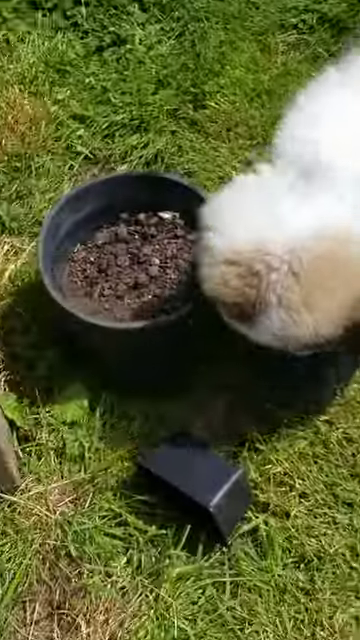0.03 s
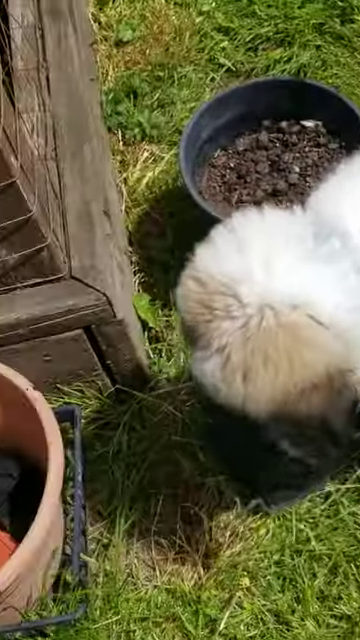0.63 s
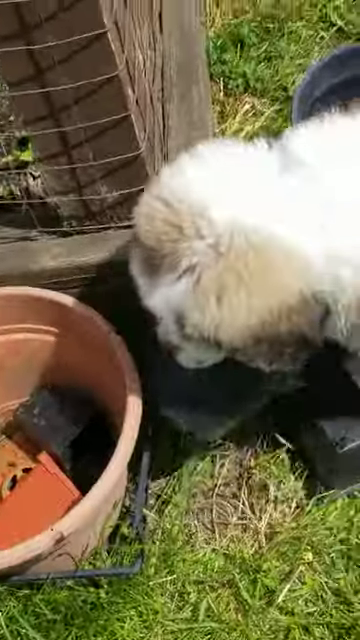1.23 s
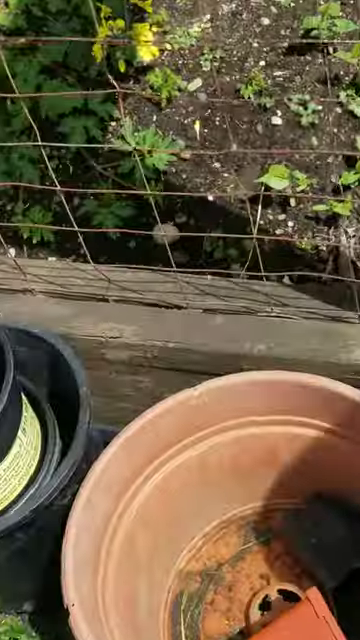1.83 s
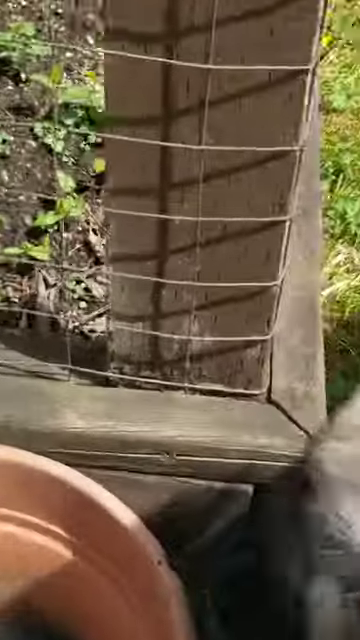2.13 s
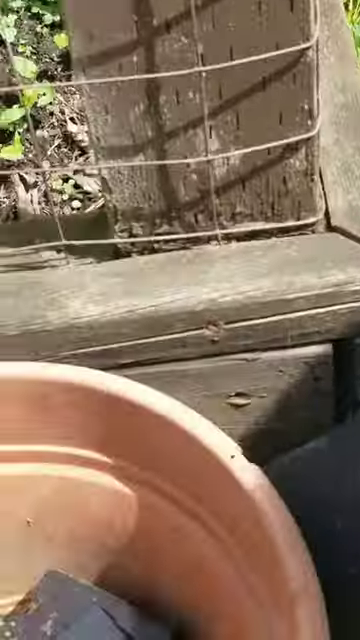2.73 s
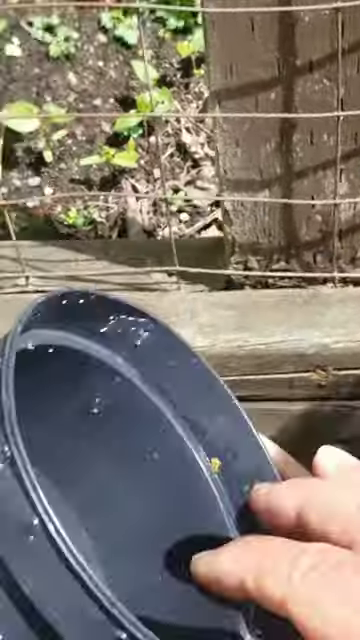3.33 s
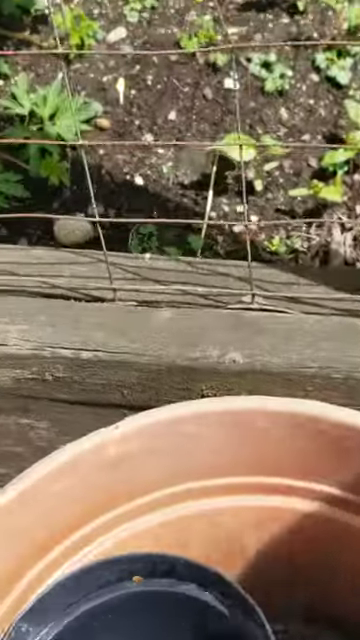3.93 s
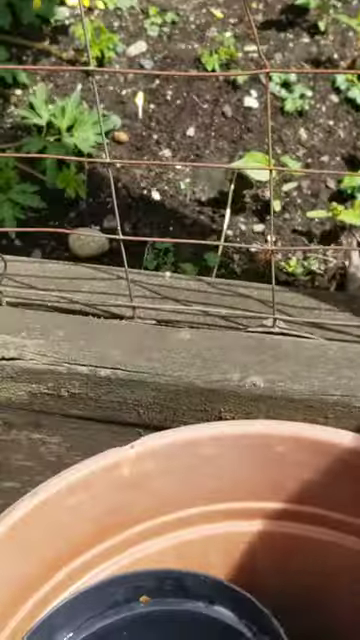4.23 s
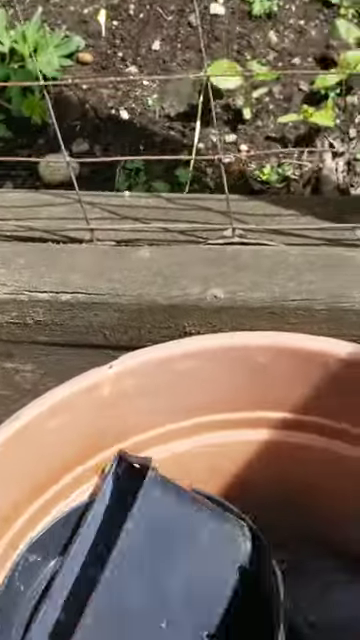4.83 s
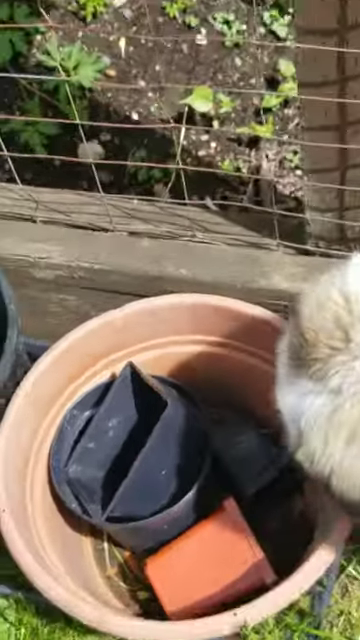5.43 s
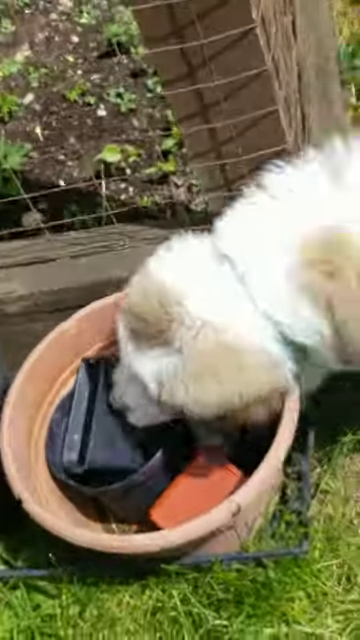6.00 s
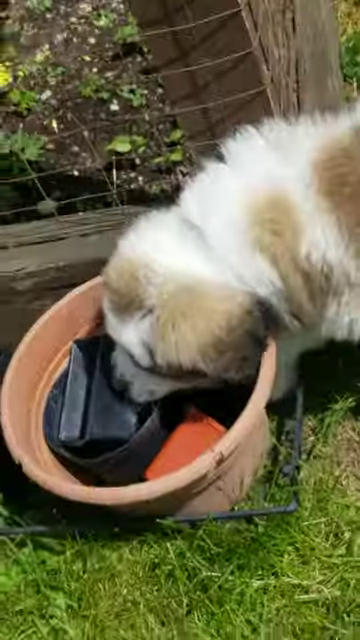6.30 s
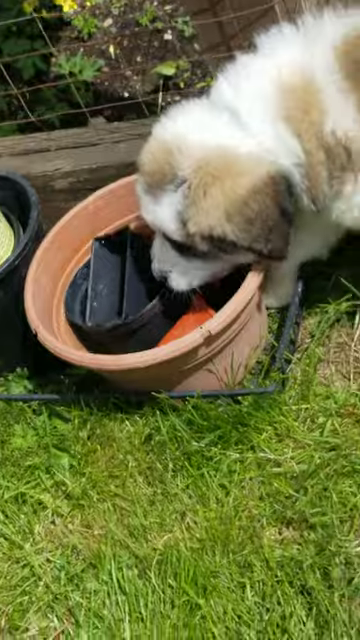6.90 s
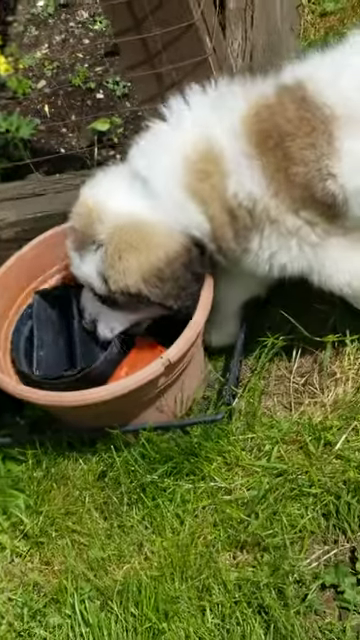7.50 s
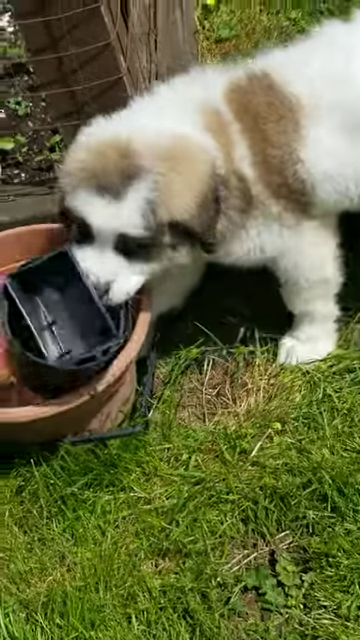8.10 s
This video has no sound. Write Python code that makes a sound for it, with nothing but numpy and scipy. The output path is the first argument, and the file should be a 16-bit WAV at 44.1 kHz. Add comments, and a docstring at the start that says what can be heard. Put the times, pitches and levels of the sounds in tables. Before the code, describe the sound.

A puppy noses thin plastic plant pots on a lawn, making light, hollow knocks while wind bumps the microphone. The pots are picked up and dropped into a large tub in two louder bursts of clattering and scraping. After a short lull the puppy chews them, with two sharp cracks, small taps and soft brushing of fur. The pots sound close, with faint grass rustle and a far engine hum behind.

```python
"""A puppy and plastic pots

A puppy noses plastic plant pots on a lawn; the pots are picked up and dropped into a big tub,
where it chews them. Thin walls chatter, scrape and snap, and the hollow pots and the tub ring
briefly. Fur brushes the plastic and steps rustle the grass. A breeze bumps the microphone,
and an engine drones far away."""
import sys
import numpy as np
from scipy import signal
from scipy.io import wavfile

SR = 44100
rng = np.random.default_rng(int(sys.argv[2]) if len(sys.argv) > 2 else 0)


def unload_audio(sound):
    """Save the sound as a 16-bit wav file, at the path given as the first command line argument."""
    columns = np.transpose(np.atleast_2d(sound))
    # keep every value between -1 and 1, then stretch to whole-number steps
    steps = np.round(np.clip(columns, -1, 1) * 32767)
    wavfile.write(sys.argv[1], SR, steps.astype(np.int16))


N = 359612
SIZE = 8192  # samples in one short sound
T = np.arange(SIZE) / SR

# Pots knocking; a decay time (t60) is how long a sound takes to fall by 60 dB:
# (time [s], wall [dB], hollow [dB], tub [dB], favoured wall pitch [Hz], chatter decay [s])
POT_KNOCKS = [(0.102, -33, -42.5, -45, 1390, 0.081), (0.296, -30, -50, -38.5, 2130, 0.094),
              (0.74, -40, -47.5, -46, 1800, 0.081), (1.111, -39, -59, -44, 1700, 0.061),
              (1.439, -31, -43, -57, 1240, 0.12), (1.47, -26, -38.5, -41.5, 1420, 0.085),
              (1.839, -32.5, -43.5, -39.5, 1400, 0.052), (1.904, -40.5, -50, -50, 1410, 0.052),
              (1.967, -49, -55, -48.5, 1080, .033), (2.409, -46, -40, -46, 1040, 0.047),
              (2.611, -26, -34, -38, 1800, 0.058), (2.631, -27.5, -47, -44, 2360, 0.06),
              (2.647, -26, -36, -33, 1240, 0.051), (2.659, -32, -22, -41, 1180, 0.047),
              (2.695, -29.5, -38.5, -44, 1280, 0.037), (2.736, -37, -36.5, -49.5, 1170, .06),
              (2.878, -27, -35, -35, 1100, .1), (3.066, -32, -41.5, -38, 1420, 0.043),
              (3.107, -19.5, -30, -27, 1490, 0.053), (3.385, -38.5, -41, -40, 1510, 0.059),
              (3.436, -12.5, -25.5, -18.5, 1700, 0.071), (3.451, -21, -33, -22, 1310, 0.038),
              (3.477, -25.5, -56, -34, 1360, 0.063), (3.499, -32, -27, -29, 1230, 0.086),
              (3.55, -21, -35, -32, 2200, .09), (3.558, -14, -27.5, -28, 1260, 0.094),
              (3.589, -25.5, -30, -35, 1170, 0.069), (3.616, -22.5, -19.5, -28, 1190, .08),
              (3.641, -15.5, -25, -30, 1540, .027), (3.657, -40, -21, -42, 1020, 0.075),
              (3.691, -25.5, -32, -37, 2060, 0.11), (3.712, -31.5, -36, -43, 1550, 0.017),
              (3.776, -27.5, -31, -37, 1330, 0.056), (4.052, -23.5, -38, -40, 2110, 0.058),
              (4.106, -27, -34, -39, 1770, 0.056), (4.152, -25.5, -36, -51, 2150, 0.19),
              (4.182, -23, -38, -30.5, 1700, 0.057), (4.263, -28.5, -50, -46, 1510, .1),
              (4.321, -27.5, -53, -38, 1040, 0.066), (4.336, -11.5, -27.5, -24, 1780, 0.1),
              (4.362, -15, -29, -42, 1750, 0.068), (4.477, -19.5, -38, -33.5, 1810, 0.063),
              (4.491, -23.5, -34, -34, 1050, 0.12), (4.529, -26, -38, -33.5, 1400, 0.25),
              (4.638, -22, -37, -25.5, 1500, .06), (4.655, -17, -30.5, -23, 1590, 0.093),
              (4.679, -24.5, -37, -32.5, 1800, 0.11), (4.719, -18, -37, -20.5, 1740, 0.093),
              (4.796, -34.5, -54, -34.5, 1080, 0.064), (4.84, -33, -39, -35.5, 1180, 0.11),
              (4.913, -30.5, -39, -36, 1117, 0.052), (5.467, -29, -55, -48, 1390, 0.037),
              (5.53, -32, -55, -51, 1120, 0.085), (5.647, -32, -55, -57, 2010, 0.014),
              (5.677, -39, -39, -53, 1344, 0.071), (5.897, -35, -41, -49, 1400, 0.049),
              (6.019, -24, -40.5, -36, 1090, 0.087), (6.118, -28.5, -40, -42, 2320, 0.096),
              (6.376, -33.5, -43, -50, 1010, 0.05), (6.515, -34.5, -52, -43.5, 1030, 0.034),
              (6.771, -26, -47, -57, 1130, 0.065), (6.789, -26, -45, -34.5, 1020, 0.048),
              (6.901, -24, -37, -38, 1410, 0.025), (7.046, -40, -40, -36, 1624, .028),
              (7.15, -29, -59, -36.5, 2350, 0.19), (7.207, -26, -46, -35, 990, 0.078),
              (7.261, -24, -47, -30.5, 1000, 0.067), (7.403, -32.5, -43, -41, 2200, .07),
              (7.552, -29, -53, -38.5, 1760, 0.12), (7.615, -34.5, -47, -55, 1560, 0.062),
              (7.738, -23, -37.5, -38, 1210, 0.055), (7.753, -28, -44, -44, 1310, 0.15),
              (7.896, -34.5, -43.5, -57, 1200, 0.034), (7.923, -26, -39.5, -32, 1920, .05),
              (7.946, -28, -44.5, -45, 1600, 0.081)]
# plastic buckling under a hand or teeth: (time [s], crack [dB], sheet [dB], tub [dB], decay [s])
WALL_SNAPS = [(2.711, -28, -62, -52, 0.056), (3.559, -10.5, -39, -52, 0.052),
              (3.642, -19.5, -55, -55, 0.014), (4.052, -22.5, -46, -53, 0.043),
              (4.337, -16.5, -35, -54, 0.081), (4.364, -22, -38, -50, 0.054),
              (4.638, -21, -46.5, -50, 0.03), (6.153, -8, -25.5, -37, 0.023), (6.406, -20, -56, -69, .03),
              (6.422, -26, -63, -60, 0.036), (6.454, -5, -32.5, -51, 0.035), (6.72, -47, -52, -57, 0.035),
              (7.209, -25.5, -39, -55, .05), (7.318, -34, -53, -70, .03)]
# strokes of rubbing: (time of peak [s], level [dB], swell [s], fade [s])
SCRAPE_STROKES = [(0.31, -49.5, 0.012, 0.032), (0.8, -59, .06, 0.078), (1.09, -62.5, 0.07, 0.034),
                  (1.42, -59, 0.035, 0.12), (1.79, -62, 0.013, 0.023), (2.09, -59, 0.094, 0.017),
                  (2.64, -56, 0.11, 0.15), (3.085, -51, 0.015, 0.017), (3.62, -42, 0.067, 0.045),
                  (3.81, -48, .045, .04), (4.33, -50, 0.11, 0.17), (4.675, -50.5, 0.024, 0.036),
                  (4.75, -48, 0.029, 0.057), (4.92, -52.5, 0.067, 0.051), (5.56, -61.5, 0.08, 0.17),
                  (6.06, -56.5, 0.14, 0.16), (6.53, -57, 0.36, 0.085), (6.82, -48, 0.041, 0.089),
                  (7.22, -54, 0.097, 0.18), (7.56, -56.5, 0.083, 0.1), (8.0, -60.5, .25, 0.36)]  # pot on pot
DRAG_STROKES = [(4.19, -28.5, .008, 0.012), (4.26, -42, 0.033, .14), (4.73, -36.5, 0.031, 0.057),
                (4.86, -51, 0.043, 0.096)]  # rim on tub
FUR_STROKES = [(6.125, -45, 0.016, 0.016), (6.25, -48.5, 0.061, 0.13), (6.435, -45, 0.04, 0.021),
               (6.585, -55.5, 0.048, 0.041), (6.838, -50.5, 0.09, 0.068), (7.21, -45.5, 0.065, 0.032),
               (7.265, -40, 0.0094, 0.019), (7.37, -51.5, 0.071, 0.041), (7.51, -48.5, 0.011, 0.024),
               (7.6, -53.5, .05, .04)]  # muzzle and fur on plastic
# the tones a thing rings with, called modes: (pitch [Hz], level [dB], decay [s])
WALL_MODES = [(1070, 0.5, 0.02), (1198, -0.5, 0.017), (1346, -1.5, 0.016), (1512, 1, 0.012),
              (1673, -2.5, 0.014), (1820, -2, 0.018), (1990, -2, 0.013), (2191, 0, 0.016),
              (2390, -8.5, 0.01), (2764, -6.5, 0.011), (3380, -3, 0.0051)]
HOLLOW_MODES = [(231, -0.5, 0.024), (320.5, -2, 0.035), (387.6, -2.5, 0.037), (467, -2, 0.022),
                (536, -10.5, 0.027)]
TUB_MODES = [(632, -8.5, 0.029), (748, -3, 0.026), (836, -7.5, 0.04), (956, -8.5, 0.026)]
SHEET_MODES = [(1765, -15, 0.092), (3720, -17, 0.026), (4640, 3, 0.019), (5280, 8.5, 0.015),
               (5900, 4, 0.015), (7060, 3, 0.017)]  # a thin wall as it snaps
# which side the pots are on: (time [s], left treble minus right [dB])
POT_SIDE = [(0, 6), (3, 7), (5.6, 6), (6.0, -1), (7.4, -3.5), (8.15, 6)]
# paws and feet in the grass: (time [s], level [dB])
GRASS_STEPS = [(0.27, -63), (0.8, -66), (1.1, -64), (1.47, -56.5), (1.93, -61), (2.25, -61.5), (2.6, -57.5),
               (2.85, -62), (3.05, -62), (5.3, -64.5), (5.598, -79), (7.8, -63.5), (8.08, -61.5)]
# breeze on the microphone: (time [s], level [dB])
BREEZE_LEVELS = [(0.0, -60.5), (0.43, -56.5), (1.18, -52.5), (1.29, -51), (1.72, -52.5), (2.11, -46),
                 (2.31, -47.5), (2.93, -50.5), (3.52, -48), (4.11, -56.5), (4.24, -54.5), (4.74, -54),
                 (5.26, -48), (5.67, -60), (5.88, -58), (6.22, -54), (7.58, -60.5), (8.15, -53)]
# single swirls of wind, called eddies: (time [s], bump [dB], higher flutter [dB])
EDDIES = [(1.19, -33.5, -56), (1.266, -34, -56), (1.352, -30.5, -60), (1.459, -36, -49),
          (1.679, -31.5, -58), (1.928, -40, -51), (2.057, -27.5, -42), (2.15, -26, -35),
          (2.275, -33, -42.5), (2.392, -22, -38), (2.455, -34, -31), (2.473, -22, -37), (2.532, -25, -40),
          (2.819, -34, -60), (3.186, -26.5, -58), (3.266, -21.5, -37.5), (3.892, -48, -43),
          (4.018, -34, -57), (4.801, -33, -45.5), (4.859, -42, -41), (5.071, -36, -43), (5.14, -25, -39.5),
          (5.42, -37.5, -60)]
# the far engine: (time [s], level [dB], turning rate [Hz])
ENGINE_RUN = [(0, -55, 67), (0.6, -54, 63), (1.2, -61.5, 61), (2.2, -71.5, 71), (5.3, -74, 59),
              (6.2, -58.5, 77), (7.0, -58, 64), (7.601, -49, 67), (8.15, -60, 65)]
# how each sound is spread from bass to treble: (frequency [Hz], level [dB])
CRACK_SPECTRUM = [(1500, -20), (2800, 2), (3800, 2), (4600, 5), (5300, 2), (6800, -1.5), (8300, -12),
                  (9800, 0), (11000, 4.5), (12500, -4), (15500, -7)]
SNAP_SPECTRUM = [(200, -19), (600, -25), (1200, -18), (1750, -4.5), (2900, -7.5), (3800, -6), (4700, -6.5),
                 (5400, -13), (7200, -1), (8500, -19), (11000, -6), (15500, -5)]
FUR_SPECTRUM = [(150, 13), (600, -12), (1500, -18), (3000, 1.5), (5200, 6), (7000, 4), (8800, -10),
                (10500, -0.5), (13000, 3), (15500, -3)]
GRASS_SPECTRUM = [(700, -27), (2000, -7), (4500, -1.5), (7000, -5.5), (8700, -7), (11000, -1.5),
                  (13000, -4), (15500, -4.5)]
WIND_SPECTRUM = [(15, -18), (35, -8.5), (65, 3), (110, -3), (180, -12.5), (300, -24), (600, -85),
                 (1500, -52)]
EDDY_SPECTRUM = [(15, -27.5), (40, -5), (70, -2.5), (130, -6), (220, -14.5), (500, -47), (1500, -98.5)]
FLUTTER_SPECTRUM = [(60, -11.5), (170, 2), (260, 0.5), (400, -9.5), (700, -20), (1500, -35), (4000, -49.5)]
ENGINE_SPECTRUM = [(60, 14), (250, -4), (380, 3.5), (630, 7), (760, 5.5), (1000, -4), (1300, -30),
                   (2000, -40)]
AIR_SPECTRUM = [(100, -7.5), (200, -0.5), (260, -3.5), (430, -1), (560, -4.5), (830, -6.5), (1120, -11),
                (1520, -19.5), (2500, -25), (3900, -22), (7500, -21.5), (8900, -26), (10800, -20.5),
                (15800, -22)]


def knock(edge, wall_db, hollow_db, tub_db, focus_hz, t60, rise_s=0.0016):
    """One knock rings the wall, the hollow of the pot and the tub; the hard edge adds a crack."""
    hardness = (0.047 / t60) ** 2  # a brief contact is mostly one clean blow
    rattle = chatter(t60, rise_s, first=8.7 * hardness, likeness=0.73, per_s=3200)
    wall = through(rattle, ring(WALL_MODES, band_hz=(840, 3500), focus_hz=focus_hz))
    push = chatter(t60 * 1.42, rise_s, first=11 * hardness, likeness=0.75)
    hollow = through(push, ring(HOLLOW_MODES, band_hz=(144, 595)))
    tub = through(push, ring(TUB_MODES, band_hz=(536, 1160)))
    crack = through(chatter(t60 * 0.6, rise_s / 2, first=1.4, likeness=0.13, per_s=4000), edge)
    crack_db = wall_db - 23.5 + 0.08 * (wall_db + 24)  # louder knocks are a little brighter
    body = sized(wall, wall_db - 11.5) + sized(hollow, hollow_db - 4) + sized(tub, tub_db - 6)
    return body + sized(crack, crack_db)


def knocks():
    """The pots bump each other and fall into the tub."""
    out, edge = np.zeros((2, N)), colour(CRACK_SPECTRUM)
    for s, *blow in POT_KNOCKS:
        add(out, s, knock(edge, *blow))
    return out


def snaps():
    """The thin wall flips over with a bright crack and rings, and the tub answers."""
    out, bright = np.zeros((2, N)), colour(SNAP_SPECTRUM)
    for s, crack_db, sheet_db, tub_db, t60 in WALL_SNAPS:
        flip = chatter(t60, rise_s=0.00022, first=1, likeness=0.082, per_s=12000)
        crack = through(flip, bright)
        blow = chatter(t60, rise_s=0.0003, first=2.6, likeness=0.55)
        sheet = through(blow, ring(SHEET_MODES, band_hz=(1190, 7840), detune=0.0033, uneven_db=-1.5))
        tub = through(blow, ring(TUB_MODES, band_hz=(660, 850)))
        add(out, s, sized(crack, crack_db - 17.5) + sized(sheet, sheet_db) + sized(tub, tub_db))
    return out


def scrape():
    """Sliding rims ring the same tones as the knocks, under an unsteady pressure."""
    wall = rubbed(WALL_MODES, band_hz=(800, 3640), likeness=0.44, contacts=4)
    tub = rubbed(TUB_MODES, band_hz=(520, 1170), likeness=0.75, contacts=2)
    hollow = rubbed(HOLLOW_MODES, band_hz=(143, 650), likeness=0.9, contacts=2)
    grit = shaped(slips(per_s=1100, spread_db=2.5, likeness=0.14), CRACK_SPECTRUM)
    pressure = strokes(SCRAPE_STROKES) * amp(3.26 * wander(per_s=71))
    return pressure * (amp(4) * wall + amp(2.5) * tub + amp(4) * hollow + amp(-6) * grit)


def drag():
    """A rim dragged round the inside keeps the tub humming."""
    return strokes(DRAG_STROKES) * rubbed(TUB_MODES, band_hz=(717, 915), likeness=1, contacts=2)


def brush():
    """Fur rubs on plastic with a fine hiss and a few coarser catches."""
    hiss = unit(slips(per_s=7000, spread_db=4, likeness=0.39))
    catches = unit(slips(per_s=90, spread_db=3, likeness=0.4))
    return amp(4) * strokes(FUR_STROKES) * shaped(hiss + 0.5 * catches, FUR_SPECTRUM)


def taps(per_s=9.6, spread_db=4.5):
    """A sliding pot rocks and taps at random, harder when it is pushed harder."""
    out, edge, pressure = np.zeros((2, N)), colour(CRACK_SPECTRUM), strokes(SCRAPE_STROKES)
    for when, force, place in rng.random((round(per_s * N / SR), 3)):
        db = 12.5 + spread_db * (2 * force - 1)
        tap = knock(edge, db, hollow_db=db - 12, tub_db=db - 19, focus_hz=1100 * 2 ** place, t60=0.045)
        add(out, when * N / SR, pressure[int(when * N)] * tap)
    return out


def chatter(t60, rise_s, first, likeness, per_s=1500):
    """A rattle of tiny contacts swells and dies; a sudden one starts with a clean blow."""
    clicks = rng.standard_normal((3, SIZE)) * (rng.random((3, SIZE)) < per_s / SR)
    out = stereo(clicks, likeness) * amp(-60 * T / t60) * (1 - np.exp(-T / rise_s))
    out[:, 0] += first * np.exp(-(rise_s / 0.0015) ** 2)
    return out


def ring(modes, band_hz, focus_hz=None, detune=0.019, uneven_db=5.5):
    """Fading tones; each point of contact shifts them a little and can favour those near focus_hz."""
    hz, db, t60 = np.transpose(modes)[:, :, None]
    shift, weight, sign = rng.standard_normal((3, len(modes), 1))
    if focus_hz:
        db = db + 6 * np.exp(-(np.log2(hz / focus_hz) / 0.2) ** 2)
    t = T[:SIZE // 2]
    fade = amp(db + uneven_db * weight - 60 * t / t60)
    tones = np.sign(sign) * fade * np.sin(2 * np.pi * hz * (1 + detune * shift) * t)
    return signal.sosfilt(signal.butter(2, band_hz, "band", fs=SR, output="sos"), tones.sum(0))


def slips(per_s, spread_db, likeness):
    """Surfaces stick and slip, making a stream of uneven little clicks."""
    size = amp(spread_db * np.minimum(rng.exponential(1, (3, N)), 4))
    clicks = size * rng.choice([-1, 1], (3, N)) * (rng.random((3, N)) < per_s / SR)
    return stereo(clicks, likeness)


def rubbed(modes, band_hz, likeness, contacts):
    """Several points of contact slip at once, each ringing the tones in its own way."""
    out = np.zeros((2, N))
    for _ in range(contacts):
        clicks = slips(per_s=400, spread_db=4, likeness=likeness)
        out += unit(through(clicks, ring(modes, band_hz)))
    return unit(out)


def placed(x, shadow_hz=2200, lag_samples=2):
    """The side facing the pots hears more treble; the left always hears them a touch later."""
    side_db = over_time(*np.transpose(POT_SIDE))
    bass = signal.sosfiltfilt(signal.butter(1, shadow_hz, fs=SR, output="sos"), x)
    left, right = bass + (x - bass) * amp(np.array([side_db, -side_db]) / 2)
    return np.array([np.roll(left, lag_samples), right])


def garden(x, t60=0.14, echo_db=-13):
    """Adds brief, dull echoes from the tub and the wooden fence."""
    bounces = rng.standard_normal((3, SIZE)) * (rng.random((3, SIZE)) < 0.1)
    echoes = stereo(bounces, 0.52) * (T > 0.004) * amp(-60 * T / t60)
    dull = signal.butter(1, 4500, fs=SR, output="sos")
    echoes = signal.sosfilt(dull, echoes / np.linalg.norm(echoes[0]))
    return x + amp(echo_db) * through(x, echoes)


def grass(swell_s=0.11, fade_s=0.17, stir_db=-70):
    """Blades tick in clumps as each step presses them and lets go; they never lie quite still."""
    blades = shaped(slips(per_s=1800, spread_db=4, likeness=0.078), GRASS_SPECTRUM)
    clumps = amp(1.5 * wander(per_s=40))
    tread = strokes([(s, db, swell_s, fade_s) for s, db in GRASS_STEPS])
    return amp(1) * np.hypot(tread, amp(stir_db)) * clumps * blades


def breeze():
    """Wind on the microphone makes a lumpy rumble with single bumps, all louder on the left."""
    rumble = noise(WIND_SPECTRUM, likeness=0.37)
    out = amp(4) * level(BREEZE_LEVELS) * rumble * amp(1.8 * wander(per_s=18))
    low, high = colour(EDDY_SPECTRUM), colour(FLUTTER_SPECTRUM)
    age = T / 0.0087  # a puff peaks at age 1
    for s, bump_db, flutter_db in EDDIES:
        puff = stereo(rng.standard_normal((3, SIZE)), 0.18) * age * np.exp(-age)
        bump = sized(through(puff, low), bump_db - 6)
        flutter = sized(through(puff, high), flutter_db + 0.5)
        add(out, s - 0.004, bump + flutter)
    return out * amp([[2.5], [-2.5]])


def engine():
    """A far engine hums at multiples of its turning rate, over a soft roar."""
    s, _, hz = np.transpose(ENGINE_RUN)
    turns = np.cumsum(over_time(s, hz) * (1 + 0.0021 * wander(per_s=5.7))) / SR
    hum = np.zeros(N)
    for k in range(1, 19):
        db = spectrum_db(ENGINE_SPECTRUM, k * hz[0]) - 4.9 * (k % 2)  # odd multiples are weaker
        hum += amp(db + 2 * wander(per_s=3.8)) * np.sin(2 * np.pi * (k * turns + rng.random()))
    roar = noise(ENGINE_SPECTRUM, likeness=0.83)
    return amp(-2.5) * level(ENGINE_RUN) * (unit(hum) + 0.48 * roar)


def air(db=-55.92):
    """Steady outdoor hush and microphone hiss."""
    return amp(db) * noise(AIR_SPECTRUM, likeness=0.073)


def amp(db):
    """Turns decibels into a gain to multiply by."""
    return 10 ** (np.asarray(db) / 20)


def unit(x):
    """Scales a sound to an average power of 1."""
    return x / np.sqrt(np.mean(x ** 2) + 1e-20)


def sized(x, db, window_s=0.02):
    """Gives a short sound the energy of db held for the window."""
    return amp(db) * x / np.sqrt(np.sum(x ** 2) / 2 / (window_s * SR) + 1e-20)


def add(mix, s, sound):
    """Mixes a sound in at s seconds."""
    part = mix[:, max(round(s * SR), 0):][:, :sound.shape[1]]
    part += sound[:, :part.shape[1]]


def over_time(s, values):
    """Joins timed values with straight lines."""
    return np.interp(np.arange(N) / SR, s, values)


def level(rows):
    """Gain over time from rows of (time [s], level [dB])."""
    return amp(over_time(*np.transpose(rows)[:2]))


def strokes(rows):
    """Gain over time of strokes that each swell to a peak and die away."""
    t, power = np.arange(N) / SR, np.zeros(N)
    for s, db, swell, fade in rows:
        from_peak = np.maximum((s - t) / swell, (t - s) / fade)
        power += (amp(db) * np.exp(-np.minimum(from_peak, 20))) ** 2
    return np.sqrt(power)


def wander(per_s):
    """A random drift, about 1 in size."""
    points = rng.standard_normal(N // 50)
    return over_time(np.arange(len(points)) / per_s, points) * np.sqrt(3 / 2)


def spectrum_db(spectrum, hz):
    """The level of a spectrum at any frequency."""
    known_hz, db = np.transpose(spectrum)
    return np.interp(np.log(hz + 1), np.log(known_hz), db)


def colour(spectrum):
    """A sharp click with this spectrum, for use as a filter."""
    log_gain = np.log(amp(spectrum_db(spectrum, abs(np.fft.fftfreq(SIZE, 1 / SR)))))
    return np.fft.ifft(np.exp(np.conj(signal.hilbert(log_gain)))).real[:SIZE // 2]


def through(x, response):
    """Filters a sound: every sample sets off a copy of the response."""
    return signal.fftconvolve(x, np.atleast_2d(response), axes=1)[:, :x.shape[1]]


def shaped(x, spectrum):
    """Filters a sound by a spectrum and scales it to power 1."""
    return unit(through(x, colour(spectrum)))


def noise(spectrum, likeness):
    """Steady stereo noise with this spectrum."""
    return shaped(stereo(rng.standard_normal((3, N)), likeness), spectrum)


def stereo(three, likeness):
    """Three signals become left and right, which share the first; likeness 1 makes them equal."""
    return np.sqrt(likeness) * three[0] + np.sqrt(1 - likeness) * three[1:]


def scene():
    """The pots, placed in the garden, over grass, breeze, engine and air."""
    pots = knocks() + snaps() + scrape() + drag() + brush() + taps()
    return garden(placed(pots)) + grass() + breeze() + engine() + air()


def record(dry):
    """Cuts the treble above 16000 Hz."""
    low_pass = signal.firwin(301, 16000, window=("kaiser", 8), fs=SR)
    return signal.oaconvolve(dry, low_pass[None], "same", axes=1)


dry = scene()
out = record(dry)
unload_audio(out)
```